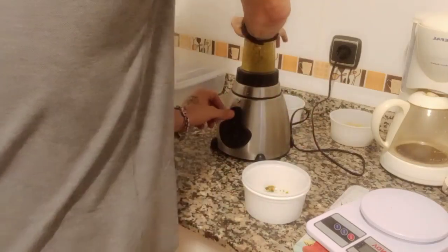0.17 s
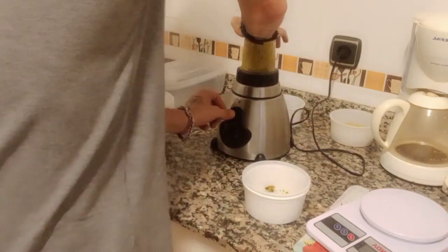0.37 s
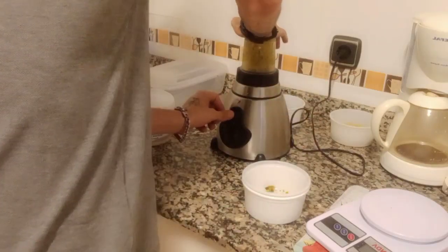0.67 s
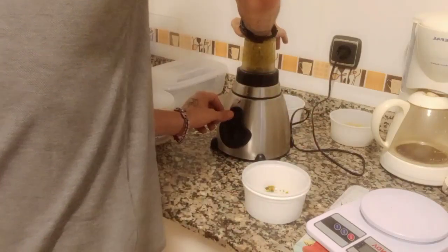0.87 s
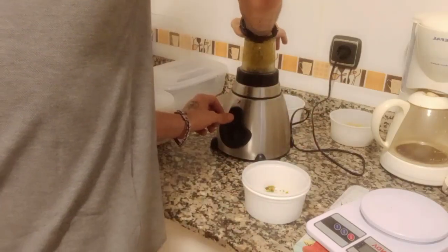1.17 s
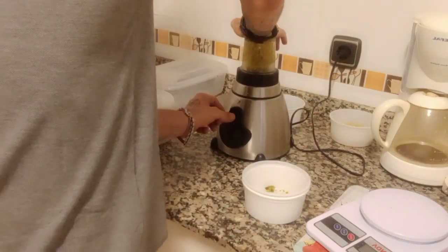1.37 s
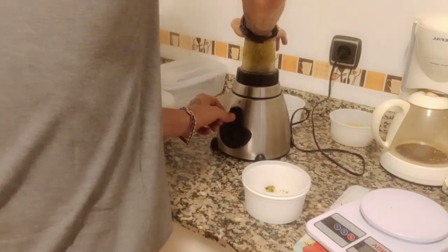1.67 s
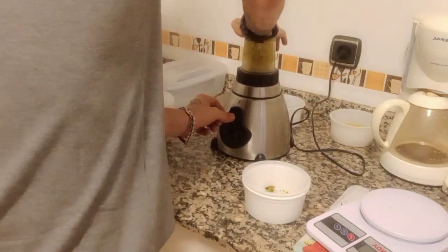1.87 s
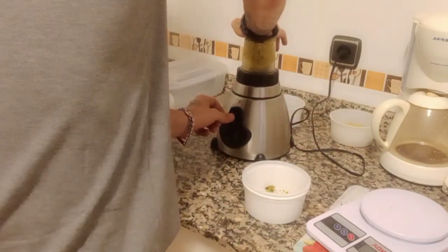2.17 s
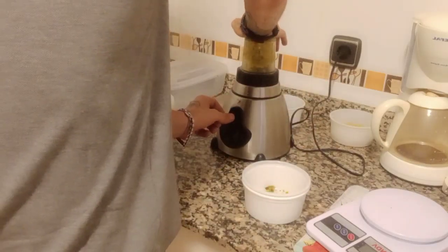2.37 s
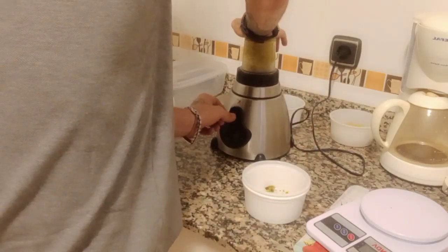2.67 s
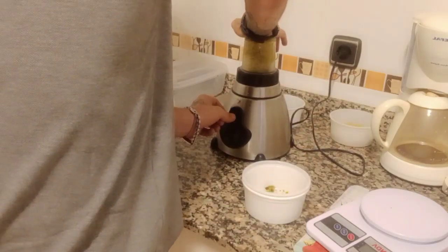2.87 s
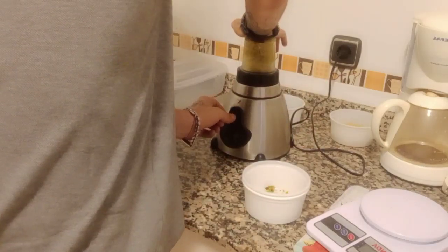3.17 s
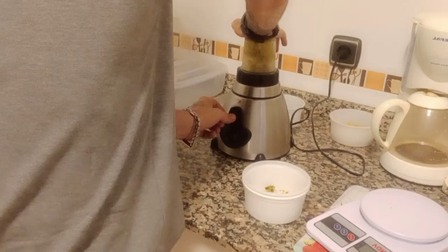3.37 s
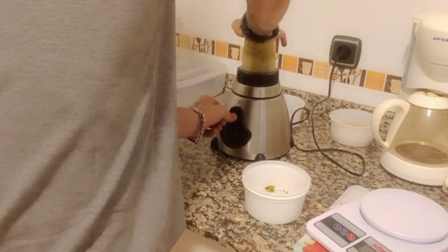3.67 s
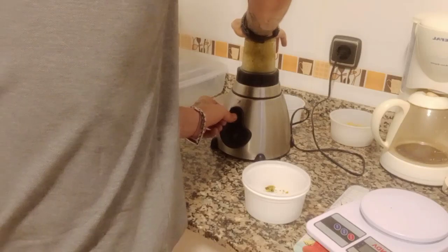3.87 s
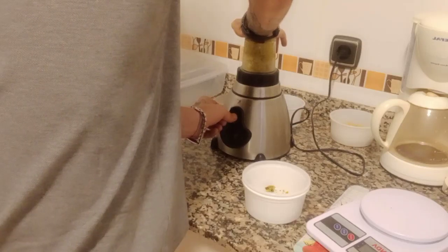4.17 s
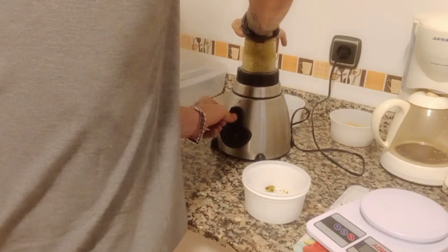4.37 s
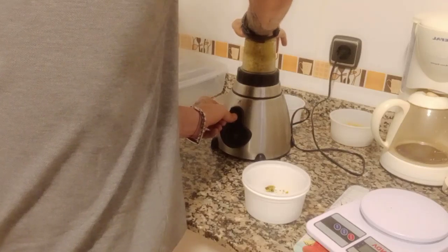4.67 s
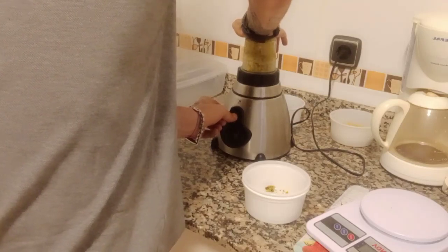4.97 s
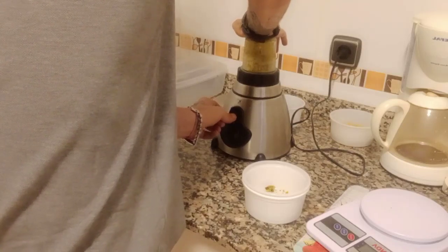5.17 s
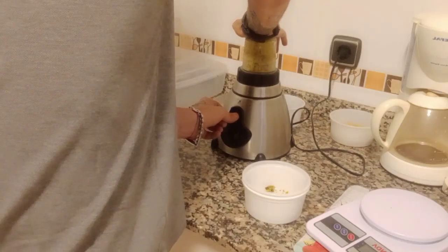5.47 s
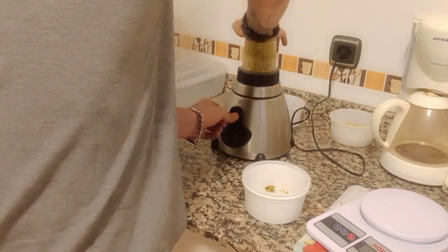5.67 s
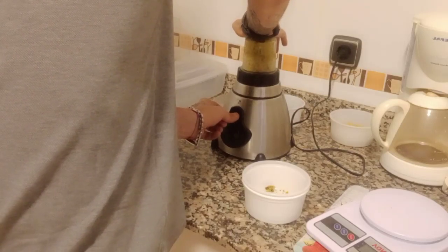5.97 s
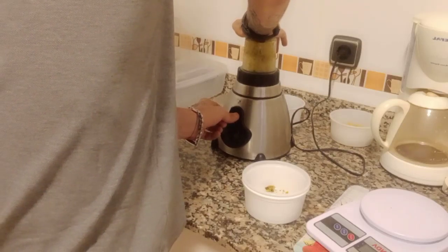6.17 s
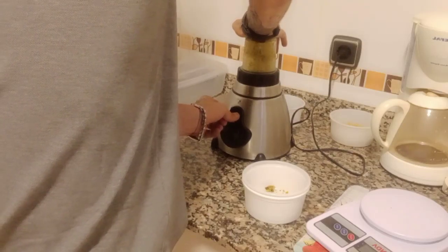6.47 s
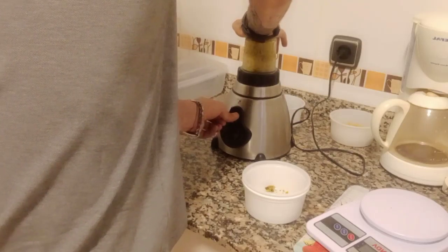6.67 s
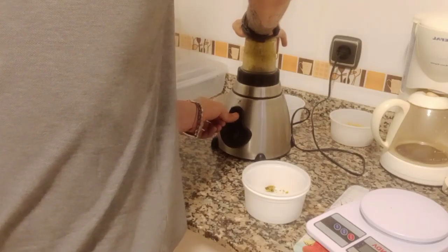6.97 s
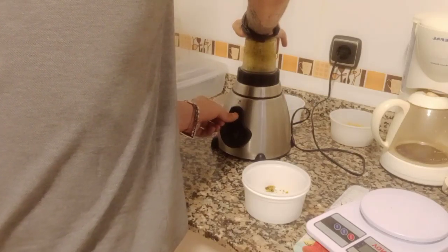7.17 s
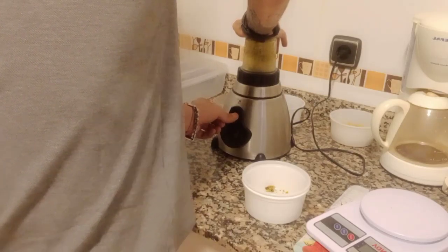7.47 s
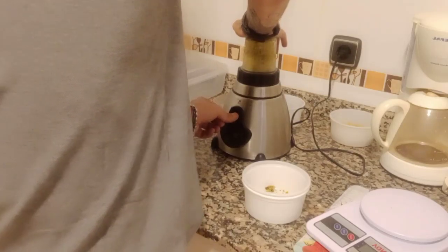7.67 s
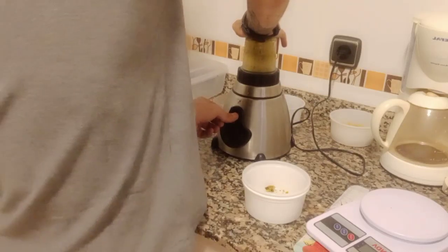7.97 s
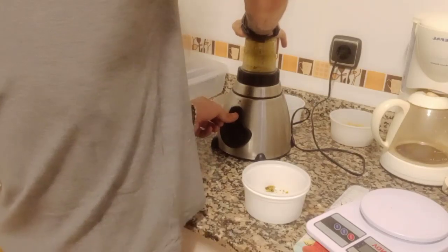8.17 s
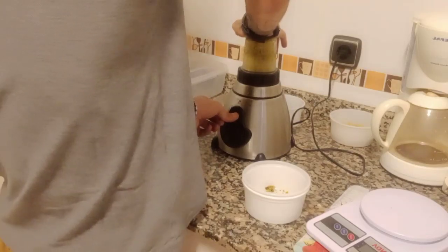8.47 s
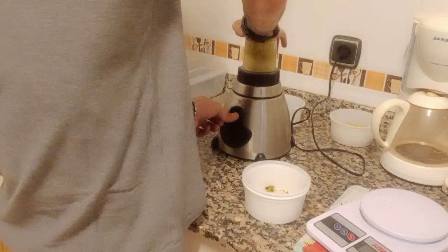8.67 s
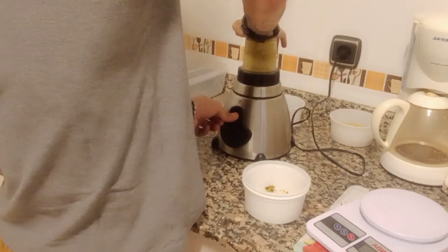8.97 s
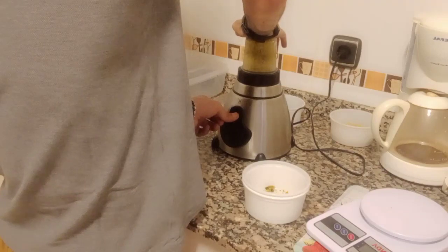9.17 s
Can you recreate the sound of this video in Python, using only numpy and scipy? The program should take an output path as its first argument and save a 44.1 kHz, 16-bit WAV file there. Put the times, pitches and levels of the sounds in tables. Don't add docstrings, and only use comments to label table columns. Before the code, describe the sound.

In a tiled kitchen, close to a phone microphone, a small blender chops hard food in six bursts. Three quick pulses give harsh crackling rattle and knocks, each running down into loose tumbling. Three later pulses, two of them over a second long, whine up to a steady, fluttering tone amid gritty clatter. Pauses hold only a faint fridge hum, slight plastic creaks and soft sleeve rustle.

```python
import sys
import numpy as np
from scipy import signal
from scipy.fft import rfft, irfft
from scipy.io import wavfile
from scipy.ndimage import uniform_filter1d

SR = 44100
rng = np.random.default_rng(int(sys.argv[2]) if len(sys.argv) > 2 else 0)


def log_audio(samples):
    frames = np.atleast_2d(samples).T
    limited = np.clip(frames, -1, 1)
    pcm = np.round(limited * 32767).astype(np.int16)
    wavfile.write(sys.argv[1], SR, pcm)


def amplitude_ratio(level_db):
    exponent = np.asarray(level_db, float) / 20
    return 10 ** exponent


N = 410571
FULL_HZ = 300


def unit(x):
    return x / np.sqrt(np.mean(x ** 2))


def modes(x, table):
    out = 0
    for k, (hz, width_hz, db) in enumerate(table):
        out = out + (-1) ** k * amplitude_ratio(db) * signal.lfilter(*signal.iirpeak(hz, hz / width_hz, SR), x)
    return out


def colour(x, table):
    hz, db = np.transpose(table)
    grid_hz = np.arange(2049) * SR / 4096
    log_gain = np.log(amplitude_ratio(np.interp(np.log(grid_hz + 1), np.log(hz), db)))
    fold = irfft(log_gain)[:2049] * np.r_[1, np.full(2047, 2), 1]
    response = irfft(np.exp(rfft(fold, 4096)))
    return signal.oaconvolve(x, response[None], axes=1)[:, :N]


def hits(per_s, spread_db):
    when, size, sign = rng.random((3, N))
    return (when < per_s / SR) * amplitude_ratio(-spread_db * np.log(size + 0.0016)) * np.sign(sign - .5)


def walk(rate_hz):
    k = int(SR / rate_hz)
    return unit(uniform_filter1d(uniform_filter1d(rng.standard_normal(N), k), k))


def by_speed(hz, table):
    speed_hz, *columns = np.transpose(table)
    return [np.interp(hz, speed_hz, c) for c in columns]


def pair(length):
    alike_hz = 660
    mid, left, right = rng.standard_normal((3, length))
    low, high = (signal.butter(2, alike_hz, kind, fs=SR) for kind in ("low", "high"))
    bass = signal.lfilter(*low, mid + 0.25 * np.array([left, -left]))
    return bass + signal.lfilter(*high, [left, right])


def room(x):
    t60_s, treble_t60_s, echo_db, direct = 0.23, 0.14, 3, 1
    t = np.arange(SR // 3) / SR
    echoes = pair(len(t))
    bass = signal.lfilter(*signal.butter(1, 2500, fs=SR), echoes)
    bass_fade, treble_fade = (np.exp(-np.log(1000) * t / s) for s in (t60_s, treble_t60_s))
    tail = (bass * bass_fade + (echoes - bass) * treble_fade) * (t > .002)
    tail *= amplitude_ratio(echo_db) / np.sqrt(np.sum(tail ** 2) / 2)
    tail[[0, 1], rng.integers(14, size=2)] = direct
    return signal.oaconvolve(x[None], tail, axes=1)[:, :N]


def scatter(x, count=3):
    place = rng.integers(count, size=N)
    return sum(room(x * (place == k)) for k in range(count))


# resonance in Hz, width in Hz, level in dB.
SQUEAK_MODES = [
    [(2530, 100, -1.5), (2580, 150, 2)],
    [(2800, 150, 4.5), (2980, 200, 6), (3200, 150, 5.5)],
]
# start in seconds, length in seconds, low squeak in dB, high squeak in dB.
CREAKS = [
    (0, 0.027, -76, -67),
    (.04, .11, -87, -69.5),
    (1.235, 0.11, -63.5, -100),
    (1.365, .075, -74, -60.5),
]


def creak():
    edge_s = 0.018
    t = np.arange(N) / SR
    slips = hits(3000, 2.5) * amplitude_ratio(3.0 * walk(60))
    grip = 0
    for start_s, length_s, *db in CREAKS:
        inside_s = np.minimum(t - start_s, start_s + length_s - t)
        grip = grip + np.outer(amplitude_ratio(np.array(db)), np.clip(inside_s / edge_s + .5, 0, 1))
    return sum(g * unit(modes(modes(slips, m), m)) for g, m in zip(grip, SQUEAK_MODES))


# start in seconds, length in seconds, level in dB.
RUSTLES = [
    (-.05, 0.3, -76),
    (6.25, 0.39, -74),
]


def rustle():
    band_hz = 4100, 10000
    t = np.arange(N) / SR
    brush = 0
    for start_s, length_s, db in RUSTLES:
        brush = brush + amplitude_ratio(db) * np.sin(np.pi * np.clip((t - start_s) / length_s, 0, 1)) ** .5
    cloth = unit(signal.lfilter(*signal.butter(2, band_hz, "band", fs=SR), pair(N)))
    return brush * amplitude_ratio(2.0 * walk(25)) * cloth


# frequency in Hz, level in dB per Hz.
AIR_SPECTRUM = [(15, -45.5), (25, -24), (76, -8), (211, -8.5), (603, -16), (1150, -24.5), (3050, -21.5),
                (3780, -48.5), (15800, -40)]
# frequency in Hz, level in dB.
FRIDGE_HUM = [(100, -82), (200, -85.5), (300, -79)]


def kitchen():
    air_db = -75
    t = np.arange(N) / SR
    hum = sum(amplitude_ratio(db + 2.5 * walk(6)) * np.sin(2 * np.pi * hz * t) for hz, db in FRIDGE_HUM)
    return amplitude_ratio(air_db) * unit(colour(pair(N), AIR_SPECTRUM)) + hum


# on in seconds, off in seconds, speed it heads for in Hz,
# braking by the food in Hz per second, blade jammed in seconds.
PULSES = [
    (0.253, 0.502, 233.4, 191, 0.0053),
    (1.438, 1.8, 194.8, 170, .005),
    (2.573, 2.853, 228, 165, 0.0047),
    (3.663, 5.015, 305, 155, .005),
    (6.574, 7.122, 305.6, 150, .005),
    (8.21, 9.403, 307.8, 150, 0.027),
]


def speed():
    run_up_s, run_up_shape, drag_per_s = .19, .78, .45
    t, hz = np.arange(N) / SR, np.full(N, 5.)
    for on_s, off_s, top_hz, brake_hz_per_s, jam_s in PULSES:
        driven_s = np.clip(np.minimum(t, off_s) - on_s - jam_s, 0, None)
        reached_hz = top_hz * (1 - np.exp(-(driven_s / run_up_s) ** run_up_shape))
        drag = np.exp(-drag_per_s * np.clip(t - off_s, 0, None))
        hz = np.maximum(hz, reached_hz * drag - brake_hz_per_s / drag_per_s * (1 - drag))
    return hz


# time in seconds, rattle in dB.
SHORT_LOADS = [
    [(0.3, -23), (0.46, -23.5), (0.604, -34), (0.632, -30.5), (0.87, -38), (1.0, -55)],
    [(1.5, -31), (1.522, -27.5), (1.848, -29.5), (1.978, -26), (2.084, -35.5), (2.18, -44.5)],
    [(2.64, -32.5), (2.696, -25), (2.824, -30), (2.836, -26.5), (3.176, -32.5), (3.33, -50.5)],
]
# time in seconds, rattle in dB.
LONG_LOADS = [
    [(3.72, -30), (3.77, -27.5), (3.94, -33.5), (3.95, -28), (4.1, -36), (4.62, -38), (5.5, -46),
     (5.98, -37), (6.13, -46)],
    [(6.63, -31), (6.74, -27.5), (7.216, -41), (7.492, -37.5), (7.514, -28), (7.632, -38.5), (7.652, -34.5),
     (7.884, -38), (8.0, -56)],
    [(8.24, -36.5), (8.266, -43.5), (8.298, -45), (8.31, -35), (8.608, -33), (8.712, -39.5), (8.874, -37),
     (9.3, -38), (9.31, -37)],
]


def load():
    trim_db, usual_db, settle_db_per_s, earlier_db = -1, -32.5, 147, -67
    jolt_share, jolt_s, bite_s = 0.14, .003, 0.036
    t = np.arange(N) / SR
    food_db, jolt = np.full(N, 1. * usual_db), np.zeros(N)
    rattle = amplitude_ratio(earlier_db - settle_db_per_s * t)
    for (on_s, *_), curve in zip(PULSES, SHORT_LOADS + LONG_LOADS):
        s, db = np.transpose(curve)
        started = t >= on_s
        since_s = np.clip(t - on_s, 0, None)
        food_db[started] = np.interp(t[started], s, db + trim_db)
        bite = 1 - np.exp(-(since_s / bite_s) ** 2)
        grip = jolt_share * (1 - np.exp(-since_s / jolt_s)) + (1 - jolt_share) * bite
        settle_db = settle_db_per_s * np.clip(t - s[-1], 0, None)
        rattle = np.where(started, grip * amplitude_ratio(food_db - settle_db), rattle)
        jolt += started * np.exp(-since_s / bite_s)
    return np.maximum(food_db - usual_db, -12), rattle, jolt


# resonance in Hz, width in Hz, level in dB.
BASE_MODES = [(48, 10, -24), (117, 8.2, -13.5), (139, 24, -12), (210, 8.4, 3.5), (261.2, 22.7, 7),
              (275.4, 44.7, 4.5), (369.6, 31, -3.5), (435.7, 26.7, -5), (560, 100, -11.5), (676, 60, -5.5),
              (729, 80, -5), (828.6, 29.5, -3), (882, 60, -8.5), (992, 344, -11.5)]
# resonance in Hz, width in Hz, level in dB.
JAR_MODES = [(1930, 300, -17), (2760, 203, 7.5), (2998, 110, -2), (4180, 33, -1.5)]
# resonance in Hz, width in Hz, level in dB.
BELL_MODES = [(2905, 22, -5), (2975, 14, -2), (3040, 12, 0), (3100, 16, -1), (3180, 22, -5)]
# resonance or band centre in
# Hz, width in Hz, level in dB.
RING_MODES = [(4470, 58, -10), (4980, 580, 4), (6300, 370, -18.5), (11850, 630, -0.5)]
# resonance in Hz, width in Hz, level in dB.
GRIT_MODES = [(7800, 790, 1.5), (9970, 1100, 1), (11500, 760, 1), (15200, 4200, -7.5)]
# frequency in Hz, level in dB per Hz.
SPRAY_SPECTRUM = [(24, -81), (40, -55.5), (101, -11.5), (268, -6.5), (539, -28), (805, -13), (1230, -9.5),
                  (3030, -3.5), (6580, -11), (7840, -10), (15800, -37.5)]
# time in seconds, peak in
# dB, thump relative to it in dB.
CHUNKS = [(0.4325, -6.5, -13), (0.4421, -3, -16.5), (0.5063, -10.5, 3), (0.5543, -12, -2.5),
          (1.452, -31.5, 12.5), (1.9826, -13, -8), (2.5899, -18.5, -0.5), (2.6755, -10, -14),
          (3.6654, -32.5, 5), (3.683, -27, 14), (3.953, -24.5, -10), (5.3644, -17, -7),
          (5.7994, -18, -11.5), (5.898, -18, -4), (6.0204, -33, -5.5), (6.5823, -26.5, -1),
          (6.5964, -16.5, 4), (6.8763, -5.5, -10.5), (7.3467, -15.5, -11.5), (8.3081, -9, -11.5)]
# time in seconds, half length in seconds, thud in dB.
TUMBLES = [
    (.53, .06, 4),
    (.72, .05, 2),
    (1.1, 0.11, -4),
    (2.0, .08, 3),
    (2.25, 0.087, 1.5),
    (3.3, 0.15, 2.5),
    (5.65, 0.098, 3),
    (7.68, 0.09, 4),
    (8.1, 0.12, -3),
]
# shaft in Hz, then relative dB of thud, deep thud, fine grit, housing.
WHIRL = [(5, -8, 3.5, -6, -15.5), (50.3, -4, 3.5, -7.5, -22.5), (101, -1, 7, -0.5, -3.5),
         (160, 2, -1, -1, 4.5), (215, 4.5, -1, 2, 7), (247, 3, -1, -0.5, 8), (305, 1.5, -11, -4, 2)]


def chopping(turn, hz):
    thud_steady, ring_steady = 0.45, 0.3
    jolt_thud_db, bell_db, bell_fade_db_per_s = 15.5, 18, 1.5
    t = np.arange(N) / SR
    surplus_db, rattle, jolt = load()
    thud_db, deep_db, grit_db, ring_db = by_speed(hz, WHIRL)
    thud_db = thud_db - thud_steady * surplus_db + jolt_thud_db * jolt
    ring_db = ring_db - ring_steady * surplus_db
    for at_s, half_s, db in TUMBLES:
        thud_db += db * np.exp(-((t - at_s) / half_s) ** 2)
    gust = rattle * amplitude_ratio(0.64 * walk(11)) * (1 + 0.25 * np.cos(turn))
    tumble = np.clip(1.1 - np.gradient(turn) * SR / (2 * np.pi * FULL_HZ), 0, 1)

    bits = unit(hits(6000, 4.06))
    at_s, chunk_db, thump_db = np.transpose(CHUNKS)
    at = (at_s * SR).astype(int)
    chunks, thumps = np.zeros((2, N))
    chunks[at] = -amplitude_ratio(chunk_db + 5.5)
    thumps[at] = -amplitude_ratio(chunk_db + thump_db)
    struck = gust * bits + chunks

    whole = amplitude_ratio(-bell_fade_db_per_s * t)
    fine = scatter(struck)
    jar = modes(fine, JAR_MODES) * amplitude_ratio(7.5)
    jar += modes(fine * tumble ** 2 * whole, BELL_MODES) * amplitude_ratio(bell_db)
    jar += colour(fine, SPRAY_SPECTRUM) * amplitude_ratio(12.0)
    ring = modes(scatter(gust * amplitude_ratio(ring_db) * unit(hits(8000, 4))), RING_MODES) * amplitude_ratio(3.0)
    grit = modes(scatter(struck * amplitude_ratio(grit_db)), GRIT_MODES) * amplitude_ratio(5.5)

    new_turn = np.diff(turn // (2 * np.pi), prepend=0)
    knock = unit(new_turn * amplitude_ratio(2.54 * rng.standard_normal(N)))
    falling = tumble * (0.71 * bits + 0.92 * unit(hits(500, 2.5)))
    shaken = scatter(gust * amplitude_ratio(thud_db) * (falling + 0.58 * knock) + 2.4 * thumps)
    base = amplitude_ratio(deep_db) * modes(shaken, BASE_MODES[:3]) - modes(shaken, BASE_MODES[3:])
    return jar + ring + grit + base * amplitude_ratio(20.0)


# multiple of shaft speed, level in dB at full speed.
ORDERS = [(4, -41), (5, -46), (6, -43), (7, -49), (8, -47), (9, -49), (10, -48), (11, -50)]
# multiple of shaft speed, level in dB.
MAINS_SHAKE = [(0, -42), (1, -51), (2, -46)]
# shaft in Hz, tone in dB, second multiple in dB, third in dB.
UNBALANCE = [(30, -84.5, -80, -75), (97, -41, -30.5, -36), (150, -37, -39.5, -44),
             (200, -28.5, -41.5, -47.5), (246.4, -20, -46.5, -39), (266, -10.5, -41, -32.5),
             (284, -13.5, -29, -31), (295, -12.5, -41, -28.5), (305, -13.5, -38, -43.5)]
COAST_DB = -13, -10.5, -4.5
# centre in Hz, half width in Hz, left in dB, right in dB.
STANDING_WAVES = [(212.5, 6.4, 10, 8.5), (230, 2.7, 1.5, -5.5), (250.3, 5.8, -4, -15), (266.7, 5.4, 4, 7),
                  (271.2, 2.3, -13.5, -8), (271.3, 2.6, -5, -33), (286.3, 1.1, -21, -30.5),
                  (303, 1.8, 4.5, -1.5), (296.1, 3.4, -3, -7.5)]


def shaft(hz):
    mains_hz, tone_pan_db, build_up_s = 100, 0, 0.046
    slots, slot_db, slot_peak_hz, slot_width_hz = 12, -44, 200, 25
    chopped_db_per_s = .8
    t = np.arange(N) / SR
    tone_db, second_db, third_db = by_speed(hz, UNBALANCE)
    turn = 2 * np.pi * np.cumsum(hz * (1 + 0.0037 * walk(27))) / SR
    switch = sum((t > on_s) & (t < off_s) for on_s, off_s, *_ in PULSES)
    held = signal.lfilter(*signal.butter(1, 6.0, fs=SR), switch)
    force = (hz / FULL_HZ) ** 2.0 * (.3 + .7 * held)
    coast_second_db, coast_third_db, coast_tone_db = COAST_DB
    second_db = second_db + coast_second_db * (1 - held)
    third_db = third_db + coast_third_db * (1 - held)

    standing_db = 0
    for centre_hz, half_hz, *db in STANDING_WAVES:
        standing_db = standing_db + np.outer(db, 1 / (1 + ((hz - centre_hz) / half_hz) ** 2))
    pan_db = np.array([[tone_pan_db], [-tone_pan_db]]) / 2
    standing = uniform_filter1d(amplitude_ratio(standing_db + pan_db), int(build_up_s * SR))

    loose = np.clip(1.15 - held * hz / FULL_HZ, 0, 1)
    lines = amplitude_ratio(second_db + (1.5 + 4.0 * loose) * walk(30)) * np.sin(2 * turn)
    lines += amplitude_ratio(third_db + (.7 + 4.0 * loose) * walk(30)) * np.sin(3 * turn)
    for k, db in ORDERS:
        lines += force * amplitude_ratio(db + 2.5 * walk(8)) * np.sin(k * turn + .2 * walk(20))

    slot_gain = np.exp(-((hz - slot_peak_hz) / slot_width_hz) ** 2) * amplitude_ratio(slot_db + 4 * walk(20))
    lines += held * slot_gain * np.sin(slots * turn)
    current = np.clip(1.25 - hz / FULL_HZ, 0, 1)
    hum_force = 2 * held * current ** 1.6 * amplitude_ratio(-chopped_db_per_s * t)
    for k, db in MAINS_SHAKE:
        strength = force if k else hum_force
        lines += held * amplitude_ratio(db + 1.1 * walk(9)) * strength * np.sin(k * turn + 2 * np.pi * mains_hz * t)

    tone_gain = amplitude_ratio(tone_db + coast_tone_db * (1 - held) + 2.5 * loose * walk(35))
    tone = standing * tone_gain * np.sin(turn + .7 * loose ** 2 * walk(30))
    tone = signal.lfilter(*signal.butter(3, 85, "high", fs=SR), tone)
    return np.sqrt(2) * tone, np.sqrt(2) * lines, turn


def scene():
    hz = speed()
    tone, lines, turn = shaft(hz)
    echoing = room(0.55 * lines + 0.045 * tone.mean(axis=0) + creak())
    return echoing + rustle() + kitchen() + chopping(turn, hz) + tone + 0.56 * lines


def roll_off(x):
    return signal.sosfilt(signal.butter(12, 15940, fs=SR, output="sos"), x)


def record(dry):
    top_hz = 15900
    cut = signal.ellip(8, .2, 60, top_hz, fs=SR, output="sos")
    mix = signal.sosfilt(cut, np.tanh(0.59 * dry) / 0.62)
    return roll_off(mix)


dry = scene()
out = record(dry)
log_audio(out)
```